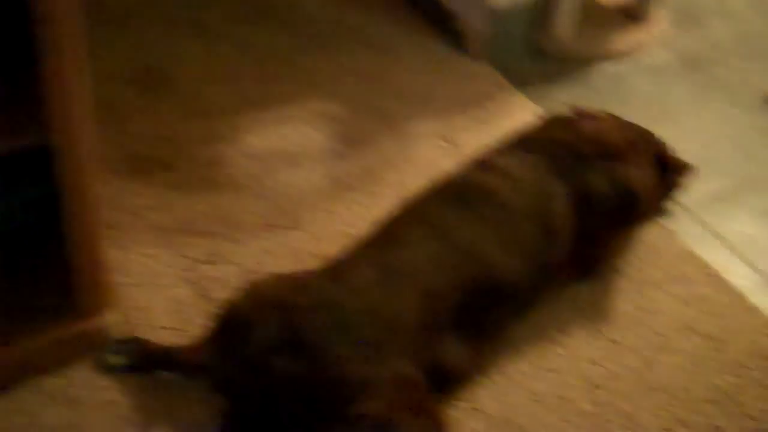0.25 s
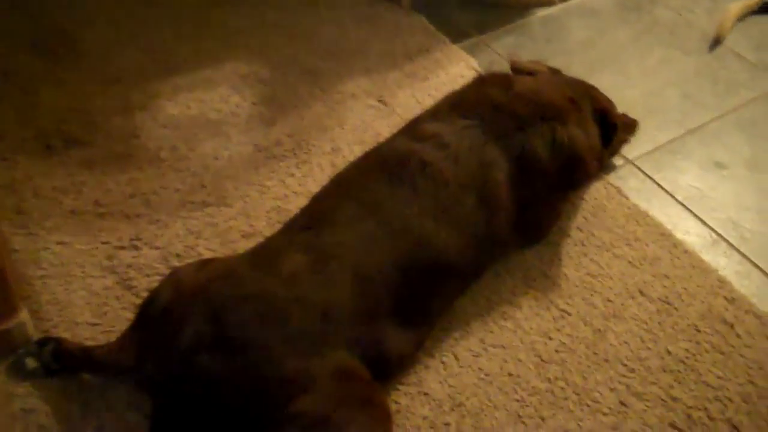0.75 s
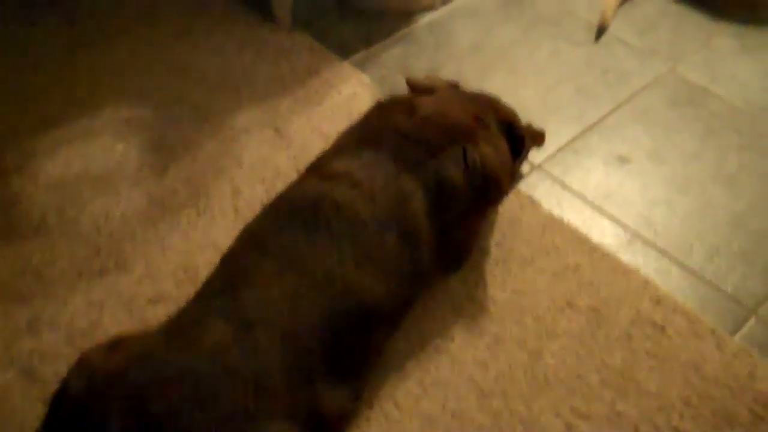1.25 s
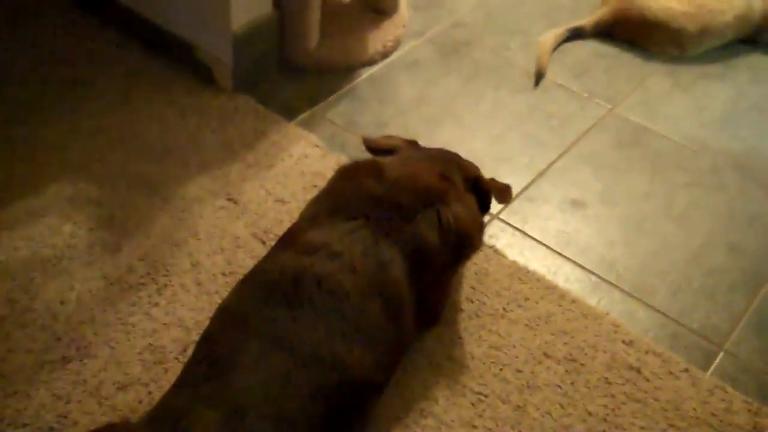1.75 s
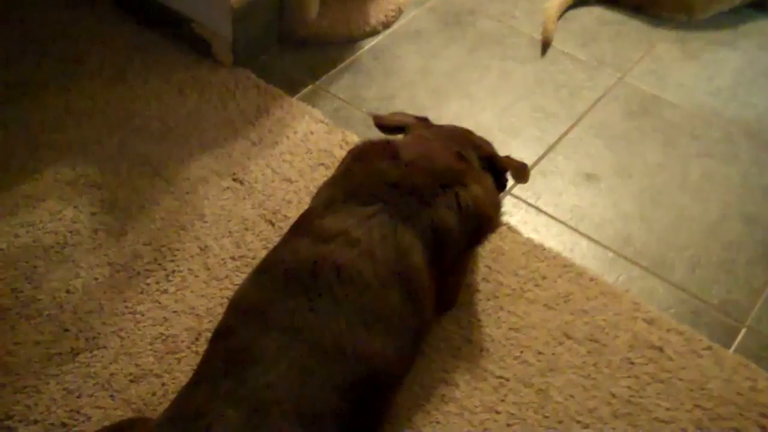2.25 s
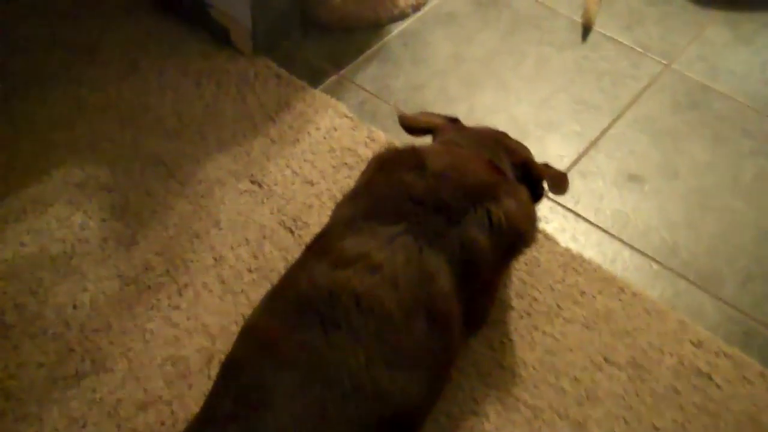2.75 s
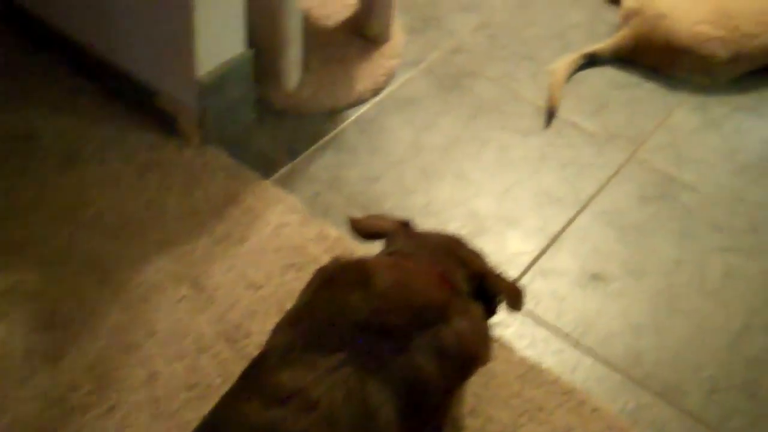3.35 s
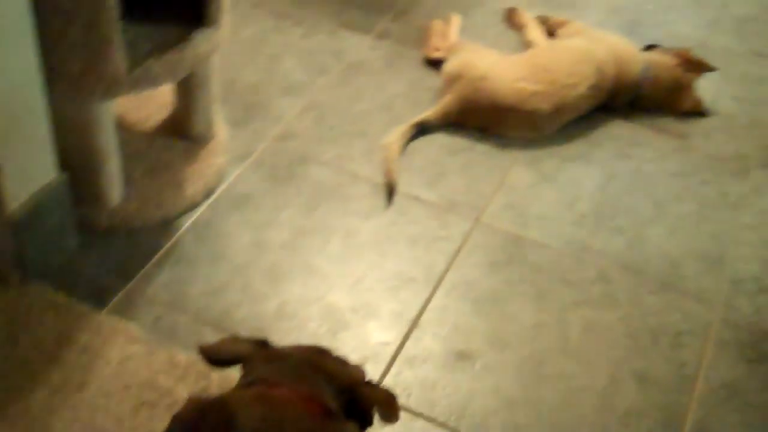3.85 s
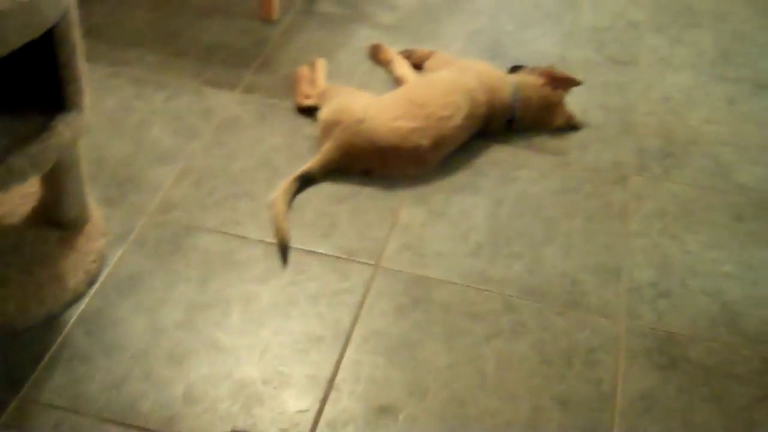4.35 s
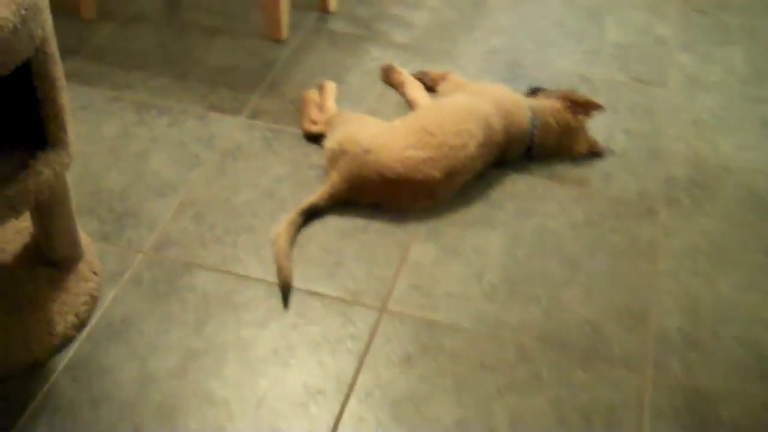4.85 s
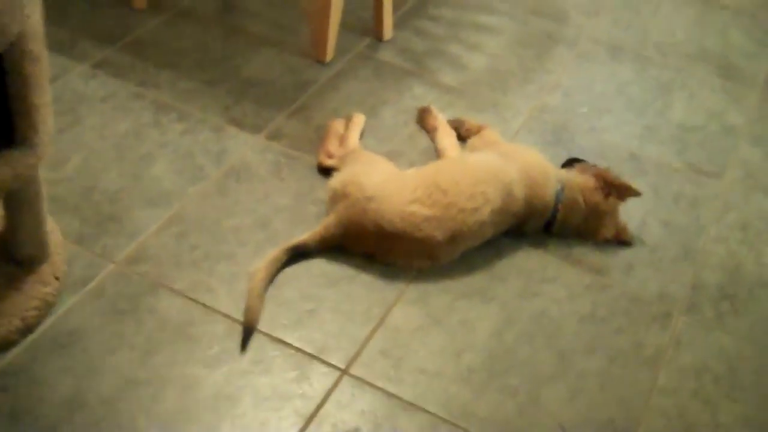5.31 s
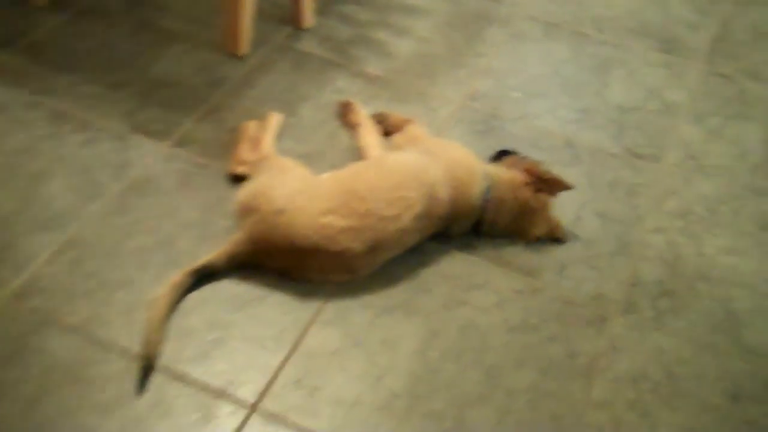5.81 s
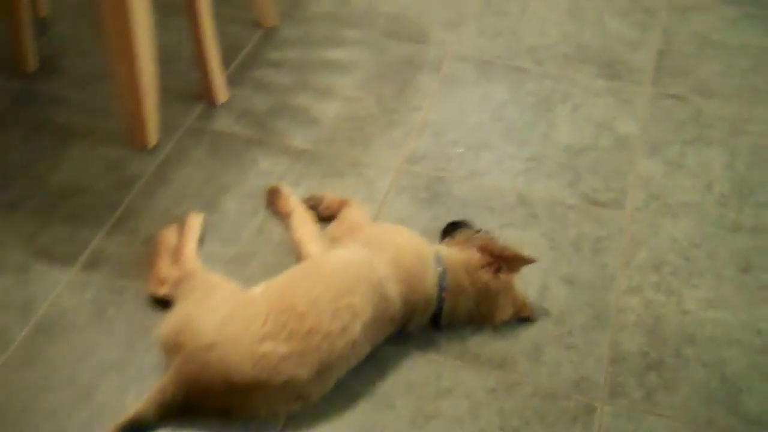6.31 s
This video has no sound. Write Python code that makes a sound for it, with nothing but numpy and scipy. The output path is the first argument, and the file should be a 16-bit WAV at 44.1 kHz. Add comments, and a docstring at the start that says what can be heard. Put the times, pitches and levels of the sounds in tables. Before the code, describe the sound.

In a quiet tiled room with a faint motor hum and soft hiss, a dog shakes its head about two seconds in. The metal tags on its collar clash and ring brightly while its ears flap quickly. The tags settle with a few clinks, soft bumps sound on the floor, and a second, lighter jingle follows. The stereo sound is brighter on the left.

```python
"""A tiled room on a stereo microphone pair: motor hum, room air, soft hiss and faint rustling.
After a small tick and a bump, a dog shakes its head, about two seconds in: the metal tags on its collar
clash, rebound and ring, brighter on the left microphone, while its ears flap.
The tags settle, clink once more and, after a few soft bumps, give a second, lighter jingle."""
import sys
import numpy as np
from scipy import signal
from scipy.fft import rfft, irfft, next_fast_len
from scipy.io import wavfile

SR = 44100
rng = np.random.default_rng(int(sys.argv[2]) if len(sys.argv) > 2 else 0)


def to_wav(s):
    """Save 16-bit WAV."""
    ch = np.atleast_2d(s).T  # columns
    pcm = np.round(np.clip(ch, -1, 1) * 32767)  # PCM
    wavfile.write(sys.argv[1], SR, pcm.astype(np.int16))


N = 289858
TIME = np.arange(N) / SR
LIFE = SR // 2  # samples given to one short sound
AGE = np.arange(LIFE) / SR

# likeness of the room's sound at the two microphones: frequency_hz, correlation
MIC_LIKENESS = [(30, .7), (120, .95), (500, .92), (1000, .65), (2000, .15), (5000, .05)]
# the dog on the left microphone against the right: frequency_hz, left_minus_right_db
MIC_BALANCE = [(300, 1), (1000, -0.5), (4500, 0), (5800, -4.5), (6350, 7), (6900, 8.5), (8000, 8.5),
               (10500, 8), (12500, 19), (14000, 32)]
# reverberation of the tiled room: frequency_hz, t60_s
ROOM_DECAY = [(200, 0.26), (1500, 0.43), (7000, 0.24), (14000, 0.13)]
# steady room air: frequency_hz, gain_db
AIR_SPECTRUM = [(20, -24), (45, -5.5), (85, -1.5), (160, 2), (310, -2), (520, -6.5), (820, -4), (1400, -10),
                (2600, -11), (4500, -16.5), (6600, -12), (9000, -21.5), (14500, -23.5)]
# soft high hiss: frequency_hz, gain_db
HISS_SPECTRUM = [(1000, -7), (3500, -9.5), (5000, -6), (6600, -2.5), (8000, -13), (14000, -26.5)]
# rise and fall of the hiss: time_s, level_db
HISS_LEVELS = [(0.05, -61), (0.5, -72), (0.8, -56), (1.05, -66.5), (1.45, -67), (1.65, -71), (3.6, -54.5),
               (3.85, -55), (4.25, -56), (4.6, -53), (5.6, -55.5), (6.55, -61)]
# faint rustles: start_s, length_s, level_db
RUSTLE_SPELLS = [(0.596, .1, -58.5), (0.824, 0.049, -64), (1.265, 0.1, -60.5), (1.367, 0.036, -52.5),
                 (1.846, 0.35, -50), (3.812, 0.083, -53), (4.055, 0.06, -51.5), (4.399, 0.085, -51),
                 (4.626, 0.12, -56.5), (5.05, 0.16, -55)]
# tone of the rustling: frequency_hz, gain_db
RUSTLE_SPECTRUM = [(200, -21), (700, -1), (2000, 4.5), (3500, -2.5), (5000, -1.5), (6600, 2.5),
                   (8000, -5.5), (14000, -40)]
# an appliance motor's hum: multiple_of_motor_speed, level_db
MOTOR_HARMONICS = [(1, -66.5), (2, -62), (4, -66.5)]
# soft bumps on the floor: start_s, level_db, pitch_hz
FLOOR_BUMPS = [(1.14, -56.5, 428), (4.09, -50, 434), (4.414, -45.5, 635), (4.445, -38.5, 417),
               (4.485, -47.5, 387), (4.702, -48, 398), (4.812, -41, 338), (6.229, -55.5, 290)]
# tone of a bump: multiple_of_pitch, gain_db
BUMP_SPECTRUM = [(.15, -24), (.45, -3.5), (1, 0.5), (1.5, -7.5), (3.5, -21.5), (10, -30), (25, -58)]
# a small dry tick: start_s, level_db
DRY_TICKS = [(0.2225, -48)]
# tone of the tick: frequency_hz, gain_db
TICK_SPECTRUM = [(500, -18), (2500, -7), (4000, -1), (6500, 6), (9000, -12), (14000, -32)]
# ear flaps, one at each turn of the head: start_s, thud_db, slap_db
EAR_FLAPS = [(1.987, -40, -37.5), (2.094, -35.5, -29), (2.198, -29, -30.5), (2.296, -42.5, -27),
             (2.384, -28, -43.5), (2.469, -41, -36.5), (2.557, -44.5, -41.5), (2.633, -41.5, -38.5),
             (2.724, -45.5, -37)]
# dull part of a flap: frequency_hz, gain_db
THUD_SPECTRUM = [(100, -33), (230, -20.5), (330, -6.5), (440, 0), (570, -5), (780, -0.5), (1050, -4.5),
                 (1400, -9), (2500, -17), (6000, -71)]
# bright part of a flap: frequency_hz, gain_db
SLAP_SPECTRUM = [(300, -10), (900, -12), (1400, 0), (2200, -1.5), (3500, -5.5), (6000, -6.5), (14000, -17)]
# modes of the ringing tag: pitch_hz, gain_db
TAG_MODES = [(4500, -37), (6897, -11.5), (6925, -3.5), (10035, -30.5)]
# resonances of the tags pressed together, with their split ring: pitch_hz, width_hz, gain_db
CLASH_PEAKS = [(7000, 600, 7), (7600, 1200, 0), (8700, 1900, -3), (10050, 220, -7), (10630, 460, -1),
               (12120, 260, -9), (12660, 190, -6), (13950, 520, -7.5)]
# resonances of the duller second tag: pitch_hz, width_hz, gain_db
CLANK_PEAKS = [(3000, 2600, -28), (4450, 1700, -16), (5850, 480, 0), (6350, 750, -0.5)]
# loose chatter as the dog moves: start_s, length_s, clash_db, clank_over_clash_db, ring_over_clash_db
CHATTER_SPELLS = [(1.72, 0.46, -49.5, 1, -13), (2.073, 0.71, -32.5, -0.5, 1), (2.936, 0.2, -42, 0, 5),
                  (4.585, 0.045, -51.5, -2, -14), (5.056, .17, -45.5, 6, 7)]
# clear blows of the tags: start_s, ring_db, clash_db, clank_db, ring_t60_s
TAG_BLOWS = [(0.894, -55, -55, -66, 0.13), (1.732, -38, -51, -42.5, 0.022), (1.822, -44.5, -57, -63, .04),
             (1.848, -51, -36.5, -41.5, .05), (1.917, -42, -45, -43, 0.044), (2.029, -27, -32.5, -32, .035),
             (2.054, -14, -17, -16.5, 0.017), (2.131, -32, -26.5, -24.5, .05),
             (2.220, -18, -18.5, -29, 0.045), (2.279, -24, -26, -24, 0.098),
             (2.328, -21, -22.5, -34, 0.056), (2.36, -18, -24, -20.5, .05),
             (2.393, -21.5, -30.5, -23, 0.038), (2.465, -13, -24.5, -22, 0.066),
             (2.515, -16, -24.5, -33, .009), (2.604, -16, -22, -30, 0.066), (2.679, -21, -28, -22, 0.042),
             (2.705, -20.5, -30.5, -28, 0.025), (2.756, -18.5, -45, -44.5, 0.11),
             (2.774, -18.5, -51, -47, .1), (2.890, -25, -43, -44, 0.047), (2.927, -26, -33, -26.5, 0.072),
             (3.046, -34, -43, -38, .07), (3.11, -27.5, -63, -56, 0.11), (3.163, -24.5, -38, -51, 0.12),
             (3.297, -23.5, -38, -49, 0.062), (3.305, -20.5, -42, -41, 0.14), (4.333, -47.5, -53, -48, .06),
             (4.947, -52, -43.5, -45, .06), (5.034, -42.5, -61, -44, 0.12),
             (5.066, -22, -40.5, -34.5, 0.0096), (5.086, -21.5, -47, -40, 0.018),
             (5.101, -27, -46, -50, .012), (5.191, -42, -42, -30, .06), (5.269, -30, -48, -58, 0.23)]


def amp(db):
    """Decibels to gain."""
    return 10 ** (np.asarray(db) / 20)


def unit(x):
    """Scale to rms 1."""
    return x / np.sqrt(np.mean(x ** 2) + 1e-20)


def at_level(sound, db):
    """Set the rms of a blow's first 18 ms."""
    return amp(db) * sound / np.sqrt(np.mean(sound[:, AGE < .018] ** 2) + 1e-20)


def along(points, hz):
    """Read (frequency_hz, value) points on a log frequency axis."""
    frequencies, values = np.transpose(points)
    return np.interp(np.log(hz + 1), np.log(frequencies + 1), values)


def filtered(x, response):
    """Pass x through a frequency response."""
    size = x.shape[-1]
    padded = next_fast_len(size + 4096, True)
    return irfft(rfft(x, padded) * response(np.fft.rfftfreq(padded, 1 / SR)), padded)[..., :size]


def colour(x, spectrum):
    """Shape x by (frequency_hz, gain_db) points."""
    return filtered(x, lambda hz: amp(along(spectrum, hz)))


def resonate(x, peaks):
    """Pass x through a bank of steep-sided resonances."""
    band = lambda hz, pitch, width: 1j * hz * width / (pitch ** 2 - hz ** 2 + 1j * hz * width)
    return filtered(x, lambda hz: sum(amp(db) * band(hz, pitch, width) ** 2
                                      for pitch, width, db in peaks))


def add(track, start_s, sound):
    """Mix a stereo sound into the track."""
    span = track[:, round(start_s * SR):][:, :sound.shape[1]]
    span += sound[:, :span.shape[1]]


def spell(start_s, length_s, attack_s, release_db_per_s, sag_db_per_s=0):
    """Envelope: attack, a hold that may sag, and release."""
    age = np.maximum(TIME - start_s, 0)
    fall_db = sag_db_per_s * age + release_db_per_s * np.maximum(age - length_s, 0)
    return np.minimum(age / attack_s, 1) * amp(-fall_db)


def diffuse(size):
    """Noise at the two microphones, alike in the bass and unrelated in the treble."""
    angle = lambda hz: np.arccos(along(MIC_LIKENESS, hz)) / 2
    noise = rng.standard_normal((2, size))
    mid, side = filtered(noise, lambda hz: np.array([np.cos(angle(hz)), np.sin(angle(hz))]))
    return np.array([mid + side, mid - side])


def in_room(sound, wet_db):
    """Carry a sound to the microphones on a fresh path: direct, then off the tiled walls."""
    hz, age, spectra = signal.stft(diffuse(LIFE), SR, nperseg=256)
    decay = amp(-60 * age / along(ROOM_DECAY, hz)[:, None])
    tail = signal.istft(spectra * decay, SR, nperseg=256)[1][:, :LIFE]
    path = amp(wet_db) * tail / np.linalg.norm(tail[0])
    path[:, 0] += 1  # direct sound
    return signal.fftconvolve(sound[None], path, axes=1)[:, :len(sound)]


def room_tone(air_db):
    """Steady room air, a drifting hiss and faint swells of rustling."""
    air = amp(air_db) * unit(colour(diffuse(N), AIR_SPECTRUM))
    hiss_db = np.interp(TIME, *np.transpose(HISS_LEVELS))
    hiss = amp(hiss_db) * unit(colour(diffuse(N), HISS_SPECTRUM))
    swells = sum(amp(db) * spell(start_s, length_s, attack_s=0.009, release_db_per_s=118)
                 for start_s, length_s, db in RUSTLE_SPELLS)
    rustle = swells * unit(colour(diffuse(N), RUSTLE_SPECTRUM))
    return air + hiss + rustle


def motor_hum(speed_hz):
    """An appliance motor hums at multiples of its speed."""
    return sum(amp(db) * np.sqrt(2) * np.sin(2 * np.pi * (multiple * speed_hz * TIME + rng.random()))
               for multiple, db in MOTOR_HARMONICS)


def pat(spectrum, rise_s, t60_s, wet_db):
    """A soft blow without ring, and the room's answer."""
    envelope = (1 - np.exp(-AGE / rise_s)) * amp(-60 * AGE / t60_s)
    return in_room(colour(rng.standard_normal(LIFE), spectrum) * envelope, wet_db)


def bumps_and_tick():
    """Dull bumps on the floor and a dry tick close to the microphones."""
    out = np.zeros((2, N))
    for start_s, db, pitch_hz in FLOOR_BUMPS:
        spectrum = [(pitch_hz * multiple, gain_db) for multiple, gain_db in BUMP_SPECTRUM]
        add(out, start_s, at_level(pat(spectrum, rise_s=0.024, t60_s=0.11, wet_db=-5.5), db))
    for start_s, db in DRY_TICKS:
        add(out, start_s, at_level(pat(TICK_SPECTRUM, rise_s=.001, t60_s=.016, wet_db=-10), db))
    return out


def ear_flaps():
    """The ears hit the head at every turn of the shake, the second one later and softer."""
    out = np.zeros((2, N))
    for start_s, thud_db, slap_db in EAR_FLAPS:
        for delay_s, ear_db in [(0, 0), (.015, -6)]:
            thud = pat(THUD_SPECTRUM, rise_s=0.0033, t60_s=0.034, wet_db=1)
            slap = pat(SLAP_SPECTRUM, rise_s=0.022, t60_s=0.04, wet_db=-1)
            flap = at_level(thud, thud_db) + at_level(slap, slap_db)
            add(out, start_s + delay_s, amp(ear_db) * flap)
    return out


def tinkle(peaks, touches_per_s=150, scatter_db=14.5):
    """Each resonance is woken by its own stream of small, uneven touches."""
    touches = lambda: (rng.random(N) < touches_per_s / SR) * amp(scatter_db * rng.uniform(-1.14, 1, N))
    return unit(sum(resonate(touches(), [peak]) for peak in peaks))


def tag_chatter(slack_db=3, slack_s=0.011):
    """The swinging tags chatter in spells and go slack for a moment whenever the head turns back."""
    clash, clank = tinkle(CLASH_PEAKS), tinkle(CLANK_PEAKS)
    ring = tinkle([(TAG_MODES[2][0], 160, 0)])  # the strongest mode, 160 Hz wide
    metal = np.zeros(N)
    for start_s, length_s, db, clank_db, ring_db in CHATTER_SPELLS:
        envelope = spell(start_s, length_s, attack_s=0.0081, release_db_per_s=191, sag_db_per_s=1)
        metal += amp(db) * envelope * (clash + amp(clank_db) * clank + amp(ring_db) * ring)
    turning = sum(np.exp(-((TIME - turn_s) / slack_s) ** 2) for turn_s, _, _ in EAR_FLAPS)
    return in_room(amp(-slack_db * turning) * metal, wet_db=0)


def tag_ring(t60_s, detune_hz=6, rise_s=0.0008):
    """The tag's modes after one touch: short when it is pinched, longer when it swings free."""
    modes = sum(amp(db) * np.sin(2 * np.pi * (hz + rng.normal(0, detune_hz)) * AGE)
                for hz, db in TAG_MODES)
    envelope = (1 - np.exp(-AGE / rise_s)) * amp(-60 * AGE / t60_s)
    return in_room(modes * envelope, wet_db=0.5)


def rebounds(gap_s, loss_db, count=4):
    """A blow and its ever weaker, unevenly spaced rebounds."""
    force = np.zeros(LIFE)
    delays_s = np.cumsum(gap_s * rng.uniform(0.27, 1.7, count))
    force[(delays_s * SR).astype(int)] = amp(-loss_db * np.arange(1, count + 1))
    force[0] = 1
    return force


def scrape(rise_s, t60_s):
    """The brief burst of one metal edge sliding onto another."""
    return rng.standard_normal(LIFE) * (1 - np.exp(-AGE / rise_s)) ** 2 * amp(-60 * AGE / t60_s)


def struck(force, peaks, spread_db):
    """Drive a tag's resonances; each point of contact favours different ones."""
    favoured = [(hz, width, db + spread_db * rng.standard_normal()) for hz, width, db in peaks]
    return resonate(force, favoured)


def tag_blows(swing_back_s=.02, swing_loss_db=12, bite_db=-9):
    """Each contact briefly clashes both tags and sets one ringing."""
    out = np.zeros((2, N))
    for start_s, ring_db, clash_db, clank_db, t60_s in TAG_BLOWS:
        add(out, start_s, at_level(tag_ring(t60_s), ring_db))
        # the ringing tag swings back and touches again, more softly
        again_s = start_s + swing_back_s * np.exp(rng.normal(0, .15))
        add(out, again_s, at_level(tag_ring(t60_s), ring_db - swing_loss_db))
        # the edges bite, then scrape and rebound a few milliseconds apart
        bite = in_room(scrape(rise_s=0.00049, t60_s=0.0065), wet_db=-3)
        add(out, start_s, at_level(resonate(bite, CLASH_PEAKS), clash_db + bite_db))
        bounces = rebounds(gap_s=0.0054, loss_db=6)
        force = signal.fftconvolve(bounces, scrape(rise_s=0.002, t60_s=0.016))[:LIFE]
        knocks = in_room(force, wet_db=12)
        add(out, start_s, at_level(struck(knocks, CLASH_PEAKS, spread_db=9), clash_db))
        add(out, start_s, at_level(struck(knocks, CLANK_PEAKS, spread_db=6.5), clank_db))
    return out


def lean_left(hz):
    """The left microphone takes in more of the dog's top treble."""
    ratio = amp(along(MIC_BALANCE, hz))
    return 2 * np.array([ratio, np.ones_like(ratio)]) / (1 + ratio)


def scene():
    """The dog's tags and ears over the quiet room."""
    dog = filtered(tag_blows() + tag_chatter() + ear_flaps(), lean_left)
    background = bumps_and_tick() + room_tone(air_db=-54.5) + motor_hum(speed_hz=58.7)
    return dog + background * amp([[.5], [-.5]])  # 1 dB louder on the left


def record(dry):
    """The recorder clips at full scale and cuts the highest treble; the left channel lags a hair."""
    top_hz, lag_s = 14300, np.array([[4], [0]]) / SR
    return filtered(np.clip(dry, -1, 1), lambda hz: (hz < top_hz) * np.exp(-2j * np.pi * hz * lag_s))


dry = scene()
out = record(dry)
to_wav(out)
```